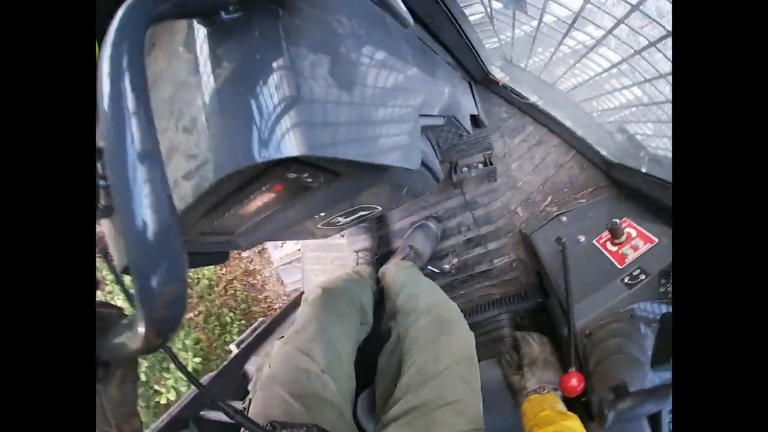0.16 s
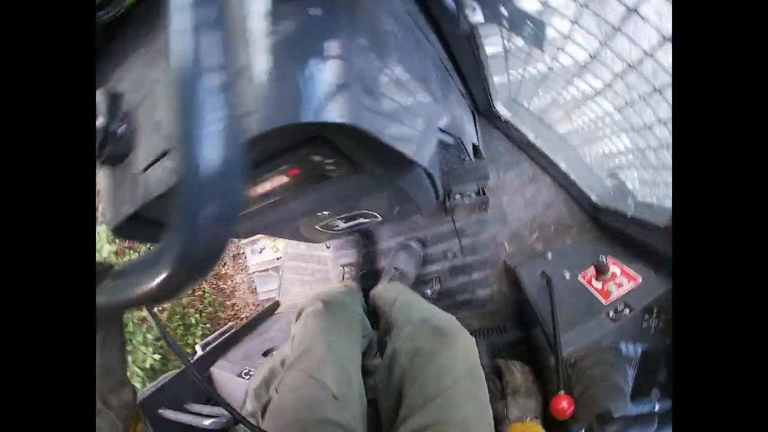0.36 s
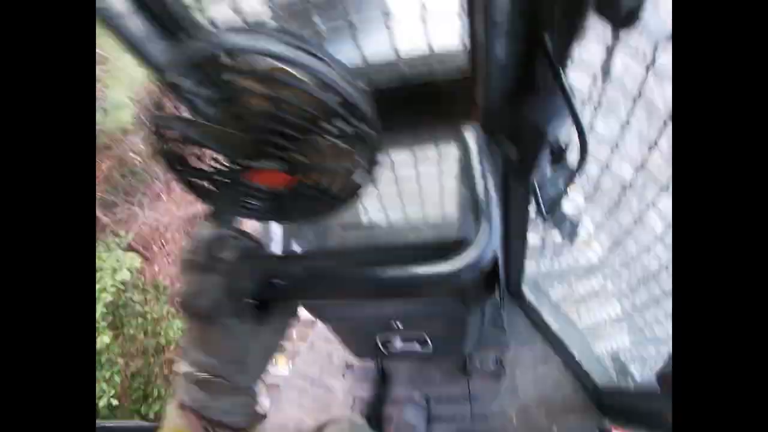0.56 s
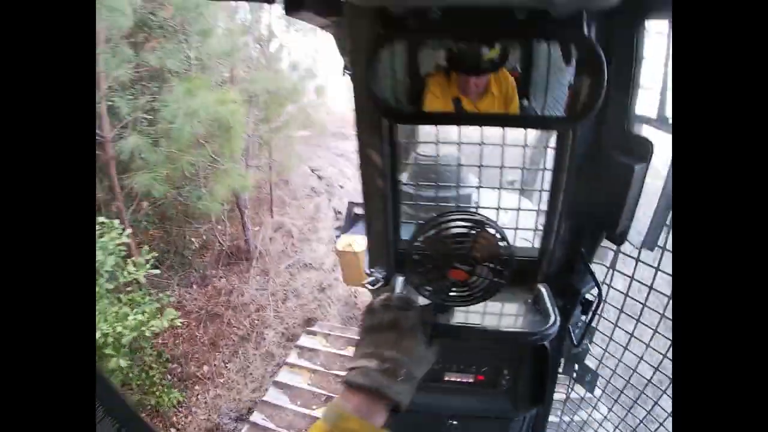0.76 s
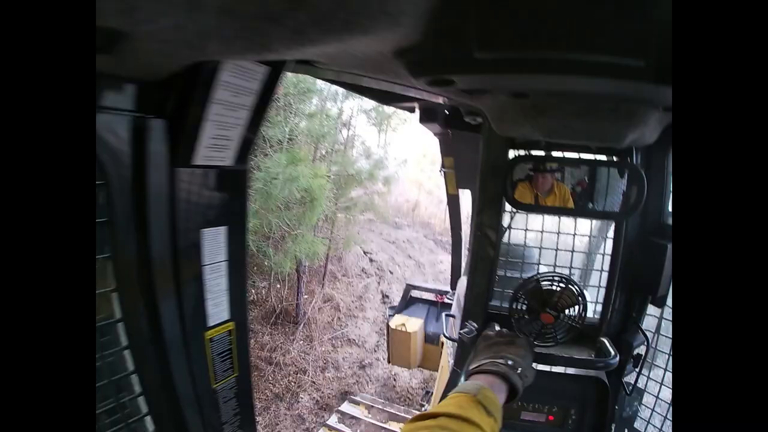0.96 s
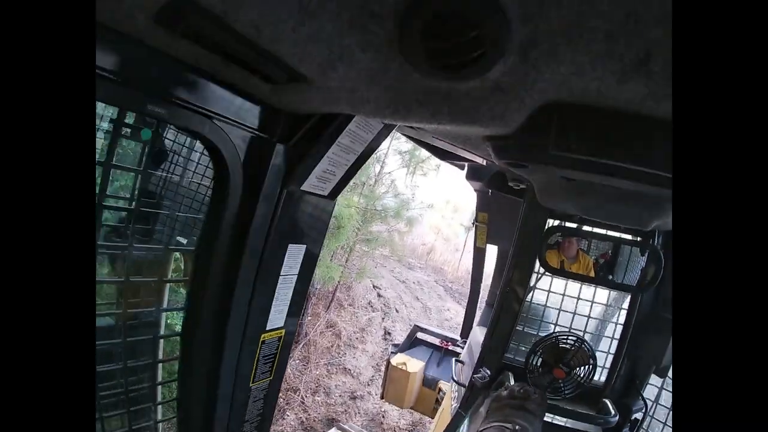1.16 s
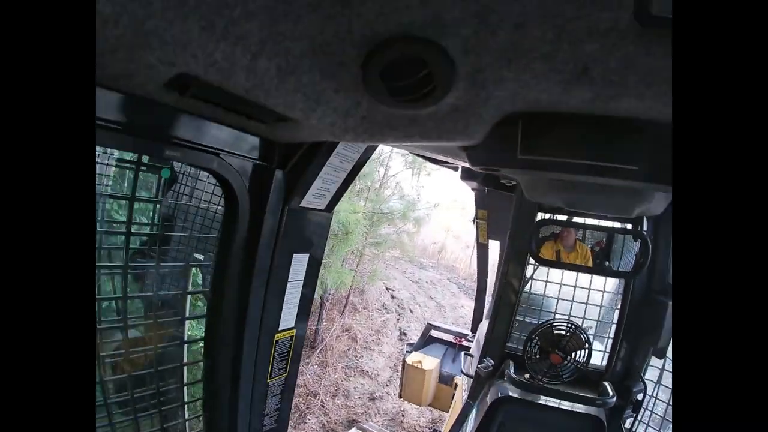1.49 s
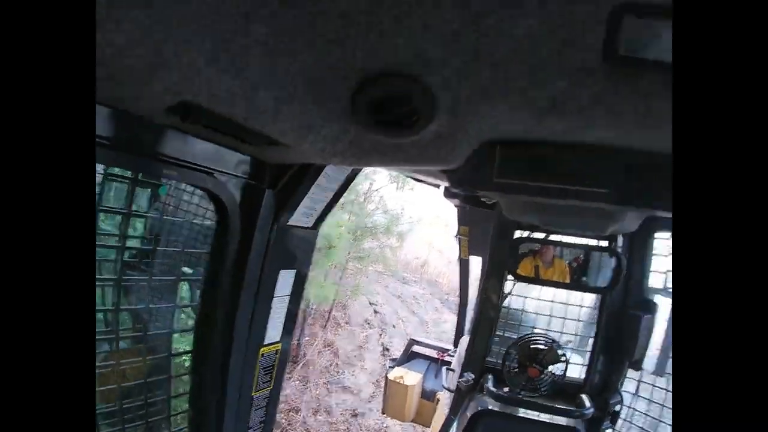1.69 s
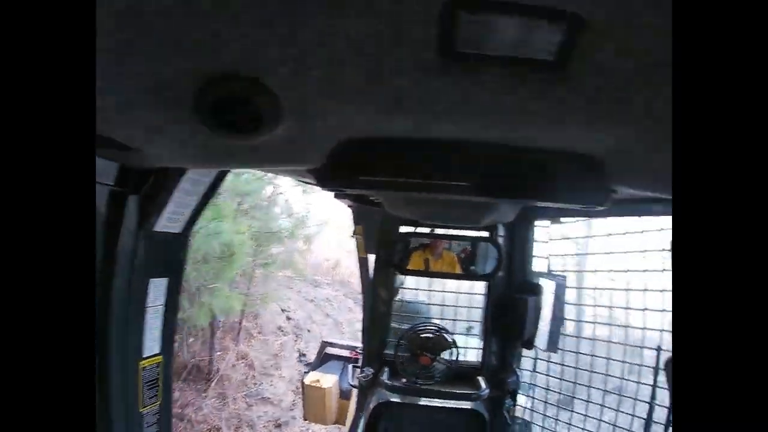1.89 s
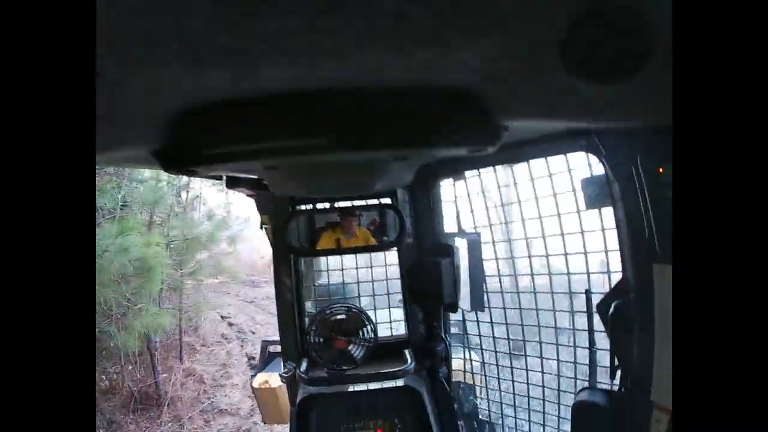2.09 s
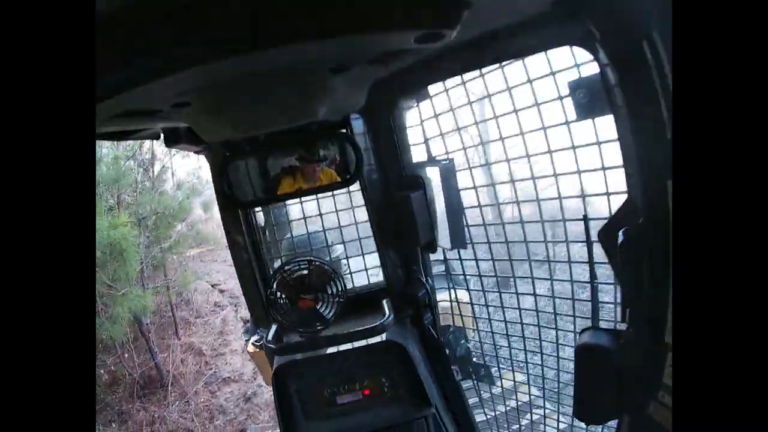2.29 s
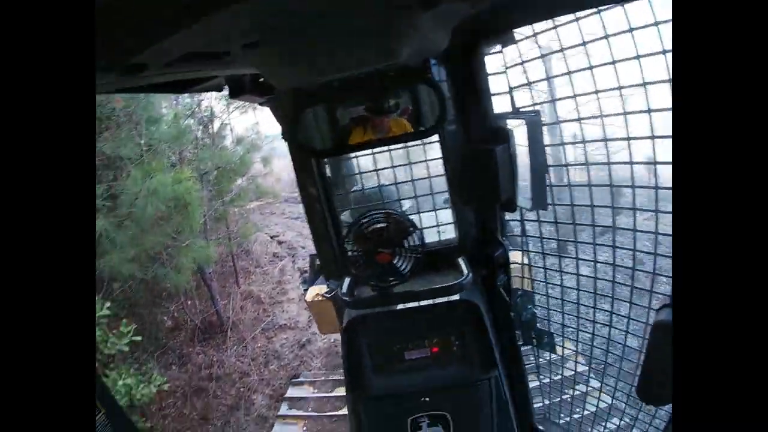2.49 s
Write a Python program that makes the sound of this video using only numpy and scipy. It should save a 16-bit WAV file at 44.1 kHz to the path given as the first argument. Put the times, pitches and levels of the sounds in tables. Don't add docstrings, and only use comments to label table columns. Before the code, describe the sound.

A diesel engine drones steadily inside a closed dozer cab, its low hum shifting in tone

```python
import sys
import numpy as np
from scipy import signal
from scipy.fft import next_fast_len
from scipy.io import wavfile

SR = 44100
rng = np.random.default_rng(int(sys.argv[2]) if len(sys.argv) > 2 else 0)


def boost_factor(decibels):
    exponent = np.asarray(decibels, float) / 20
    return 10 ** exponent


def transcribe(u):
    v = np.clip(np.atleast_2d(u).T, -1, 1)
    q = np.round(v * 32767).astype(np.int16)
    wavfile.write(sys.argv[1], SR, q)


N = 116865

# start_s, pose
HEAD_POSE = [(0, 0.0), (.4, .08), (.6, .4), (.76, .75), (.92, 1.05), (1.08, 1.7), (1.3, 1.95), (1.7, 2.05),
             (1.9, 2.4), (2.25, 2.85), (2.65, 3.0)]

# multiple, bent_db, rising_db, door_db, window_db
ENGINE_ORDERS = [(.5, -54, -54, -58, -55), (1, -45.5, -46, -44, -45.5), (2, -58, -46, -52, -51),
                 (2.5, -49, -50, -60, -56), (3, -45, -43, -49, -50), (5, -64, -54, -55, -55),
                 (6, -69, -55, -58, -58)]
FIRING_HZ = 52.82

# multiple, bent_db, rising_db, door_db, window_db
PUMP_FUNDAMENTAL = [(1, -41.5, -52, -45, -48)]
# start_s, second_db, third_db, fourth_db, fifth_db
PUMP_HARMONICS = [(0, -46, -59, -69, -69), (.3, -45, -61, -69, -72), (.5, -46.5, -72, -76, -72),
                  (.75, -47.5, -70, -72, -74), (.95, -54, -68, -70, -76), (1.1, -53, -61, -70, -64),
                  (1.3, -48, -60, -70, -70), (1.42, -50, -74, -70, -67), (1.7, -49, -74, -67, -76),
                  (1.9, -52, -72, -63, -70), (2.15, -54, -72, -72, -64), (2.3, -56, -72, -65, -68),
                  (2.45, -56, -69, -60, -67), (2.65, -56, -66, -59, -68)]
PUMP_HZ = 216.08

# start_s, level_db
FAN_LEVEL = [(0, -62), (.45, -58), (.62, -44), (.78, -38.5), (1.1, -37), (1.28, -39.5), (1.5, -36.5),
             (2.2, -36), (2.65, -37.5)]

# pitch_hz, bent_db, rising_db, door_db, window_db
MESH_TONES = [(1017.3, -76, -76, -73, -69), (1319.8, -78, -77, -68, -80)]
# start_s, level_db
GEAR_LEVEL = [(0, -59), (.35, -63), (.6, -79.5), (.75, -82.5), (.84, -57), (1.05, -62), (1.3, -76),
              (1.48, -62), (1.7, -58.5), (1.95, -61), (2.2, -63), (2.65, -70)]

# start_s, level_db
WHISTLE_LEVEL = [(0, -65), (.22, -66.5), (.26, -72), (.28, -63.5), (.335, -60), (.362, -62), (.385, -76),
                 (.7, -77.5), (.85, -65), (1.0, -84), (1.3, -71), (1.8, -79), (2.65, -76.5)]

# pitch_hz, bent_db, rising_db, door_db, window_db
AIR_MODES = [(55, -48, -48, -46.5, -45.5), (105, -51, -46, -52, -52), (130, -35.5, -40, -57, -54),
             (188, -43.5, -53, -47, -52)]
AIR_MODE_WIDTHS = [40, 18, 30, 18]

# pitch_hz, bent_db, rising_db, door_db, window_db
PANELS = [(289.3, -83.5, -47.5, -64.5, -59.5), (397.4, -51.5, -55.5, -51, -59.5),
          (494, -52.5, -61.5, -56.5, -76.5), (631.3, -60, -61, -73, -73.5),
          (921.6, -77.5, -64.5, -59, -60.5), (1068.6, -67.5, -63.5, -65, -64.5),
          (1329.5, -70.5, -76, -61, -66), (2815, -78, -71.5, -64, -69), (5480, -79, -79, -80, -77.5),
          (435.2, -69, -60, -50, -59.5), (747.4, -74, -77, -73, -60.5)]
PANEL_WIDTHS = [80, 110, 80, 60, 110, 70, 100, 1000, 800, 30, 40]

# start_s, length_s, pitch_hz, level_db
CAB_SWELLS = [(2.11, .16, 1055, -58), (2.58, .12, 650, -55), (1.0, .1, 670, -57), (.66, .08, 630, -58),
              (.86, .14, 290, -48), (1.22, .2, 185, -45), (1.63, .16, 186, -41), (1.92, .24, 190, -42),
              (2.26, .36, 132, -42), (.03, .14, 515, -52), (.28, .14, 520, -53), (.9, .12, 530, -52),
              (.2, .12, 655, -57)]

# bent_db, rising_db, door_db, window_db
ROAR_COLOUR = [(27.8, 1, -10, -7.5, 2.5), (70, -3.5, -7.5, 4, -12.5), (188, 7, 6, 1, 0.5),
               (314, -15, -2.5, -0.5, -5), (571, -13, -12, -13, -14.5), (1765, -27, -26, -23.5, -27),
               (3570, -35.5, -35, -36, -37.5), (6100, -39, -40.5, -39.5, -39)]

# low_hz, high_hz, level_db
HISS_TOP = (11700, 12500, -101)
# low_hz, high_hz, level_db
HISS_EDGE = (12500, 14400, -105.5)


def rms_one(x):
    return x / np.sqrt(np.mean(x ** 2) + 1e-20)


def in_time(rows):
    s, value = np.transpose(rows)
    return np.interp(np.arange(N) / SR, s, value)


def by_pose(levels_db):
    return boost_factor(np.interp(in_time(HEAD_POSE), np.arange(4), levels_db))


def drift(rate_hz):
    pole = np.exp(-80 * np.pi * rate_hz / SR)
    chance = rng.standard_normal(N // 40 + 2002)
    slow = signal.lfilter([1], [1, -2 * pole, pole * pole], chance)[2000:]
    slow = rms_one(slow - slow.mean())
    return np.interp(np.arange(N) / 40, np.arange(len(slow)), slow)


def noise_band(low_hz, high_hz, order):
    sos = signal.butter(order, [low_hz, high_hz], "band", fs=SR, output="sos")
    return signal.sosfilt(sos, rng.standard_normal(N + SR // 2))[SR // 2:]


def tone(hz, gain):
    phase = 2 * np.pi * (hz * np.arange(N) / SR + rng.random())
    phase = phase + 0.35 * drift(1.4)
    waver = boost_factor(1.0 * drift(4.7))
    return np.sqrt(2) * gain * waver * np.sin(phase)


def ringing(hz, width_hz, evenness=0):
    sos = signal.butter(1, [hz - width_hz / 2, hz + width_hz / 2], "band", fs=SR, output="sos")
    ring = signal.sosfilt(np.vstack([sos, sos]), rng.standard_normal(N + SR // 2))
    if evenness:
        envelope = np.abs(signal.hilbert(ring, next_fast_len(len(ring)))[:len(ring)])
        ring = ring / (envelope + 0.1 * np.std(ring)) ** evenness
    wide = signal.butter(1, [hz - 0.8 * width_hz, hz + 0.8 * width_hz], "band", fs=SR, output="sos")
    return rms_one(signal.sosfilt(wide, ring)[SR // 2:])


def knock(hz):
    beat = np.cos(2 * np.pi * FIRING_HZ * np.arange(N) / SR)
    return 1 + 0.08 * beat * (hz > 1400)


def engine():
    return sum(tone(FIRING_HZ * multiple, by_pose(db)) for multiple, *db in ENGINE_ORDERS)


def pump():
    out = sum(tone(PUMP_HZ * multiple, by_pose(db)) for multiple, *db in PUMP_FUNDAMENTAL)
    start_s, *harmonics = np.transpose(PUMP_HARMONICS)
    for multiple, level_db in enumerate(harmonics, start=2):
        gain = boost_factor(in_time(np.column_stack([start_s, level_db])))
        out = out + tone(PUMP_HZ * multiple, gain)
    return out


def fan():
    return tone(87.64, boost_factor(in_time(FAN_LEVEL)))


def gears():
    mesh = sum(tone(hz, by_pose(db)) for hz, *db in MESH_TONES)
    return mesh + tone(920.1, boost_factor(in_time(GEAR_LEVEL)))


def whistle():
    hz = 2095 + 4 * drift(4.4)
    return np.sqrt(2) * boost_factor(in_time(WHISTLE_LEVEL)) * np.sin(2 * np.pi * np.cumsum(hz) / SR)


def air_modes():
    out = 0
    for (hz, *db), width_hz in zip(AIR_MODES, AIR_MODE_WIDTHS):
        out = out + by_pose(db) * ringing(hz, width_hz, evenness=0.7)
    return out


def panels():
    out = 0
    for (hz, *db), width_hz in zip(PANELS, PANEL_WIDTHS):
        out = out + by_pose(db) * knock(hz) * ringing(hz, width_hz)
    return out


def swells():
    rise, wander = 0.02, 0.01
    out = 0
    for start_s, length_s, hz, db in CAB_SWELLS:
        progress = np.clip((np.arange(N) / SR - start_s) / length_s, 0, 1)
        pitch = hz * (1 + rise * (progress - 0.5) + wander * drift(11))
        hump = boost_factor(db) * np.sin(np.pi * progress)
        out = out + np.sqrt(2) * hump * np.sin(2 * np.pi * np.cumsum(pitch) / SR)
    return out


def roar():
    edges = 22 * 2 ** (np.arange(29) / 3)
    table_hz, *poses = np.transpose(ROAR_COLOUR)
    out = 0
    for low, high in zip(edges, edges[1:]):
        hz = np.sqrt(low * high)
        db = [np.interp(np.log(hz), np.log(table_hz), pose) for pose in poses]
        patchy = boost_factor(0.5 * drift(2.0))
        out = out + by_pose(db) * patchy * knock(hz) * noise_band(low, high, order=2)
    return boost_factor(-47) * np.sqrt(SR / 200) * out


def preamp_hiss():
    hiss = boost_factor(-87) * rms_one(noise_band(6600, 10800, order=3))
    low_hz, high_hz, top_db = HISS_TOP
    hiss = hiss + boost_factor(top_db) * rms_one(noise_band(low_hz, high_hz, order=2))
    low_hz, high_hz, edge_db = HISS_EDGE
    flicker = boost_factor(edge_db + 1.5 * drift(9))
    return hiss + flicker * rms_one(noise_band(low_hz, high_hz, order=2))


def scene():
    machinery = engine() + pump() + fan() + gears() + whistle()
    rush = roar()
    cab = air_modes() + panels() + swells()
    return (machinery + rush + cab)[None, :]


def top_cut(x):
    return signal.sosfilt(signal.butter(12, 14300, fs=SR, output="sos"), x)


def record(dry):
    sos = signal.butter(6, 5710, fs=SR, output="sos")
    settled = signal.sosfilt_zi(sos) * dry[0, 0]
    dulled = signal.sosfilt(sos, dry[0], zi=settled)[0][None, :]
    s = np.arange(N) / SR
    fade = np.sin(np.pi / 2 * np.clip(np.minimum(s, s[-1] - s) / 0.0004, 0, 1)) ** 2
    return top_cut(fade * (dulled + preamp_hiss()))


dry = scene()
out = record(dry)
transcribe(out)
```